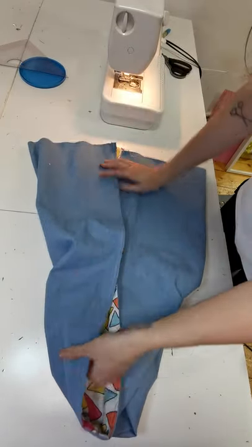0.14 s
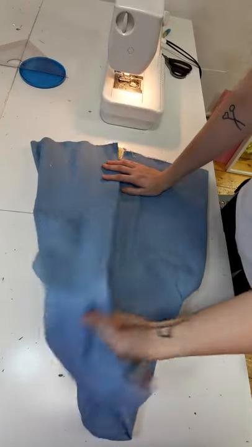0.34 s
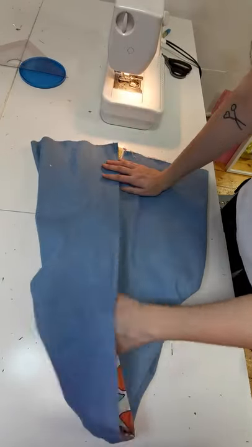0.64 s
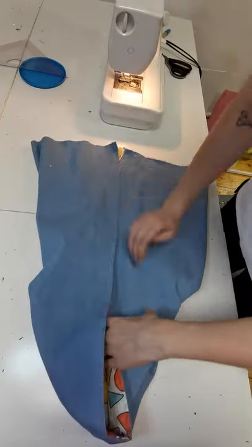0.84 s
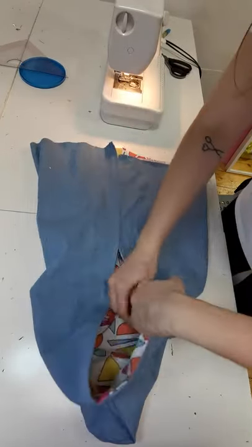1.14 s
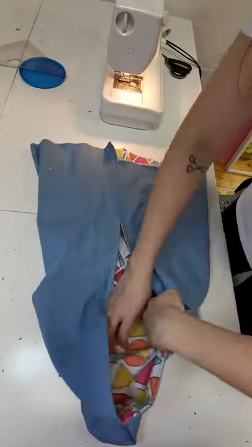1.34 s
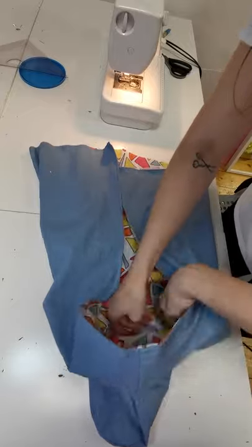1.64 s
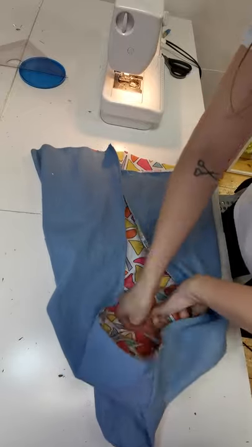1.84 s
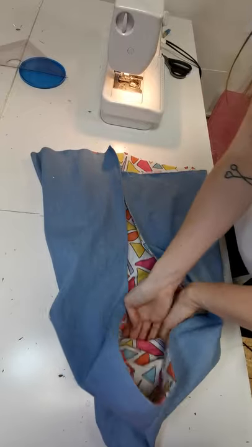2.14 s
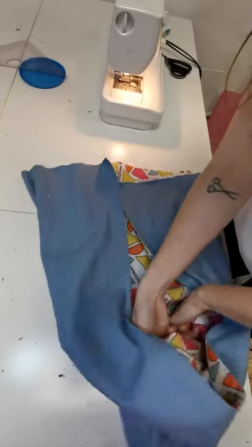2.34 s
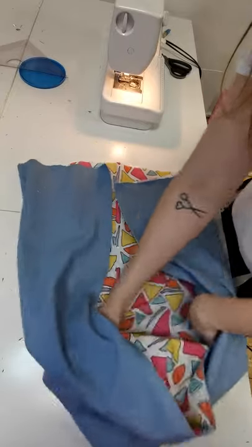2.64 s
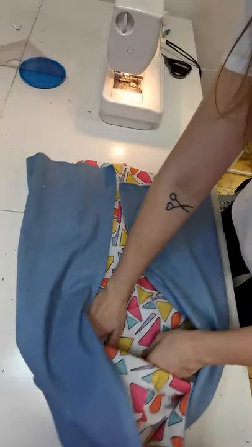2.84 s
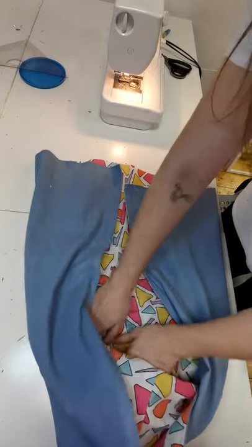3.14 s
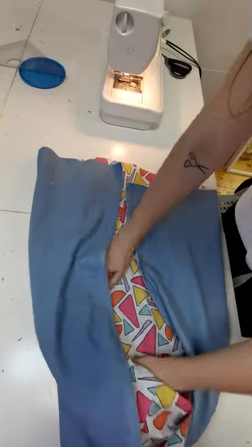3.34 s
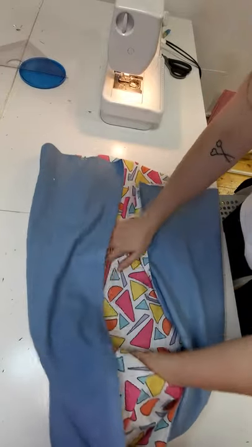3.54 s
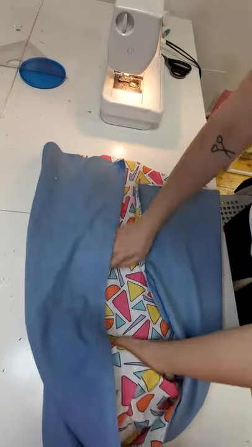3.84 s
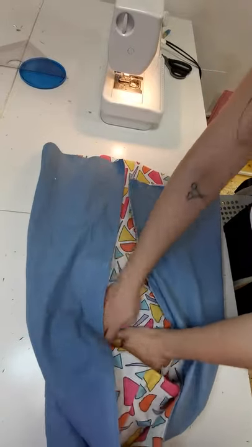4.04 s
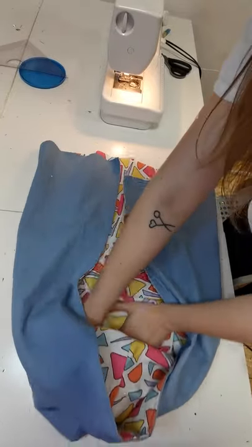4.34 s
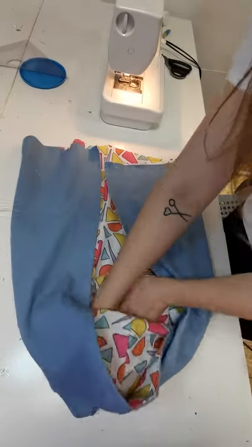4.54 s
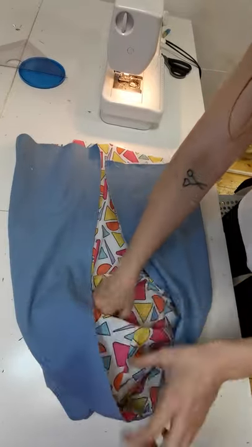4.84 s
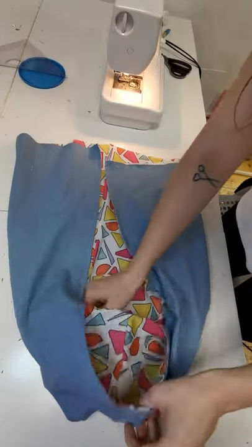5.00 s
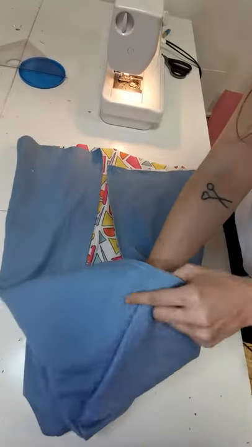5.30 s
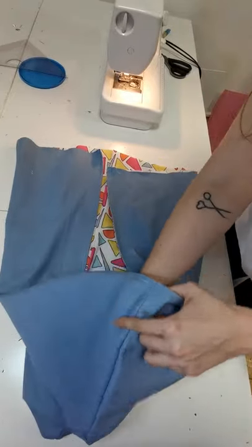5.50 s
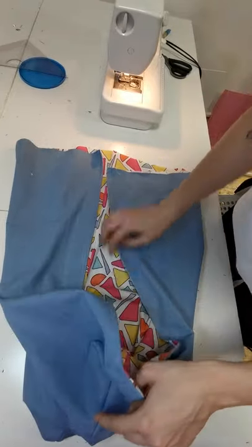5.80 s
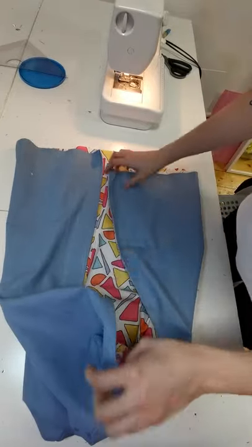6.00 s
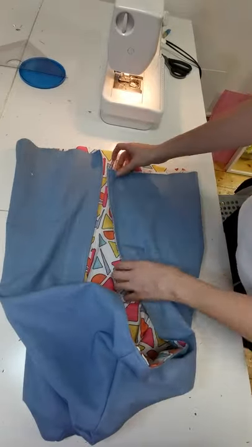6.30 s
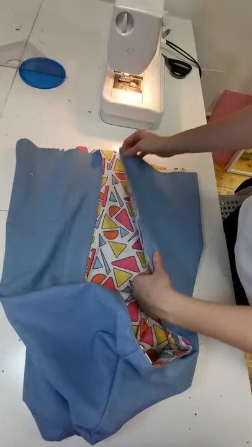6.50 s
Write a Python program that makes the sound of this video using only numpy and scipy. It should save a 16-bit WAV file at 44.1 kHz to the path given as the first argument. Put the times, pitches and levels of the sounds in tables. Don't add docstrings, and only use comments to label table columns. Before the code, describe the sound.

Hands fold and smooth heavy fabric in a quiet room, giving dull brushes, small ticks and knocks before a single loud thud.

```python
import sys
import numpy as np
from scipy import signal
from scipy.fft import rfft, irfft, next_fast_len
from scipy.io import wavfile
from scipy.ndimage import uniform_filter1d, map_coordinates

SR = 44100
rng = np.random.default_rng(int(sys.argv[2]) if len(sys.argv) > 2 else 0)


def volts_from_decibels(level):
    exponent = np.asarray(level, float) / 20
    return 10 ** exponent


def wrap_up_sound(samples):
    columns = np.atleast_2d(samples).T
    tamed = np.clip(columns, -1, 1)
    steps = np.round(tamed * 32767).astype(np.int16)
    wavfile.write(sys.argv[1], SR, steps)


N = 293706

# fastest moment in s, hiss in dB, rise in s, fall in s, sheen in dB.
STROKE_EVENTS = [(.1, -66.5, 0.033, 0.099, 0), (.26, -61, 0.12, 0.19, -2), (.352, -58.5, 0.035, .03, 1.5),
                 (0.396, -50, 0.037, 0.016, 0), (.55, -59, 0.049, 0.059, -3),
                 (.65, -67.5, 0.07, 0.067, -0.5), (.97, -67, 0.14, 0.65, -3),
                 (1.047, -64.5, 0.11, 0.041, -0.5), (1.35, -63.5, 0.15, 0.28, -1.5),
                 (1.75, -66, 0.2, 0.52, -5), (2.2, -65, 0.21, 0.44, -2.5), (2.53, -59.5, 0.089, .12, -4),
                 (2.9, -66, 0.085, 0.064, -16), (2.7, -71, .3, .7, -3.5), (3.3, -54.5, 0.055, 0.063, -3),
                 (3.62, -56, 0.058, 0.069, -0.8), (3.8, -66.5, 0.51, 0.11, -4.5),
                 (4.04, -63.5, 0.14, .08, -1.5), (4.42, -58, 0.26, .12, -5),
                 (4.68, -65.5, 0.11, 0.072, -2.5), (5.02, -64.5, 0.1, 0.1, -2.5),
                 (5.18, -66, 0.09, 0.14, 0), (5.55, -68, 0.6, 0.16, -3), (6, -72, 0.076, 0.16, 1.5),
                 (6.6, -64.5, 0.18, 0.065, -0.5)]
# frequency in Hz, density in dB per Hz.
FIBRE_SPECTRUM = [(880, -6), (1500, 0), (2380, -3), (2900, -4.5), (4460, -5), (4680, -4), (6170, -6),
                  (6870, -3.5), (7880, -7), (13100, -15.5), (15700, -12.5)]
# time in s, left-right difference in dB.
HAND_PATH = [(0, -20), (.22, -2.5), (.35, -6), (.55, -2), (.78, -5), (1.3, -4), (2.3, -3), (2.52, -9.5),
             (2.65, -7), (3.3, -4), (4.06, -3.5), (4.6, -4.5), (5.17, -6), (5.6, -5), (5.95, -3),
             (6.66, -1.5)]
# tightest moment in s, crumple in dB, rise in s, fall in s, scuff over it in dB.
CRUMPLE_EVENTS = [(.1, -62.5, 0.35, 0.27, -0.5), (.3, -53.5, 0.036, 0.014, -0.5),
                  (.39, -54, 0.098, .02, -16), (.54, -60.5, 0.072, 0.035, -3), (0.631, -59, .07, 0.11, -4),
                  (1.05, -61, 0.27, 0.062, -18), (1.31, -59, 0.025, 0.15, -2), (1.739, -73, 0.17, 0.14, 7),
                  (1.91, -59, 0.6, 0.09, -3), (2.17, -59.5, 0.12, 0.78, -5), (2.47, -57.5, 0.037, 0.31, -9),
                  (2.59, -70, .2, .14, -6), (2.95, -53.5, 0.13, 0.018, -12), (3.17, -65.5, 0.12, 0.93, -2),
                  (3.295, -50, 0.042, 0.041, -1.5), (3.6, -53, 0.05, 0.082, -4),
                  (3.97, -65, 0.26, .8, -1.5), (4.21, -58, 0.043, 0.5, -9),
                  (4.45, -51.5, 0.041, 0.075, -6.5), (4.97, -65, 0.062, 0.21, -2),
                  (5.19, -59, 0.038, 0.068, 0), (5.3, -60.5, 0.035, 0.068, -12), (5.4, -71, 0.11, 1, -24),
                  (6.34, -57, 0.022, 0.048, -3)]
# frequency in Hz, density in dB per Hz.
FOLD_SPECTRUM = [(250, -5.5), (400, -12), (650, -4), (950, -6), (1150, -11), (2500, -26)]
# start in s, peak in dB, snap length in ms, left-right difference in dB.
SNAP_EVENTS = [(.099, -47, 1.8, -3), (.168, -44, 1, -3), (.272, -52, 1.4, -3), (0.29, -47, 1.6, -4),
               (0.531, -48.5, 1.24, -4.5), (0.633, -44, 1.8, -1), (0.928, -45.5, 1.46, 3),
               (1.031, -55, 1.5, -4), (1.229, -43, 1.54, -6), (1.346, -44, 0.91, -8), (1.685, -56, 3.2, 1),
               (1.798, -48, 1.9, -5.5), (1.822, -49, 2.1, -9), (1.845, -41, 0.91, 0),
               (2.251, -50, 1.2, -10), (2.417, -46.5, 3.1, -8), (2.443, -51, 1.2, -10),
               (2.452, -43.5, 1.9, -10), (2.475, -37, 1.94, -11), (2.486, -47, 1.5, -10),
               (2.5, -51, 1.9, -4), (2.569, -44, 1.6, -14), (2.925, -39, 1.32, -16.5),
               (3.275, -43.5, 1.05, -17), (3.311, -43, 1.9, -10), (3.54, -54, 3.2, -2),
               (3.555, -52, 1.1, -2), (3.585, -42, 1.6, -12), (3.595, -40, 1.8, -8), (3.649, -50, 1.1, -13),
               (3.759, -50, 1.4, -3), (4.2, -45.5, 1.9, -11), (4.266, -41, 1.76, -8.5), (4.39, -48, 1.3, 2),
               (4.442, -49, 1.3, -6), (4.533, -48, 1.4, -10), (4.608, -44, 1.5, -1),
               (4.803, -51.5, 0.19, -14), (4.948, -38, 1.12, -3), (5.196, -44.5, 1.7, -10),
               (5.272, -41, 1.4, -9), (5.285, -43, 0.78, -18), (5.344, -50, 1.9, -5),
               (5.625, -47.5, 1.35, -6), (5.675, -52.5, 1.6, -6), (6.602, -63, 1, 0.5)]
# middle in s, peak in dB, pitch in Hz, length in ms.
SQUEAK_EVENTS = [
    (.266, -54, 2020, 6),
    (1.306, -57, 2180, 10),
    (2.552, -60, 2300, 12),
    (4.437, -52.5, 873, 20),
    (6.335, -60, 2300, 10),
]
# middle in s, level in dB, band centre in Hz, half length in s.
RUB_EVENTS = [
    (0.099, -56, 227, 0.093),
    (0.186, -53, 250, .06),
    (0.122, -71, 2050, 0.23),
    (1.341, -68, 2520, 0.083),
    (1.77, -67.5, 1940, 0.19),
    (2.499, -67.5, 2420, 0.14),
    (4.958, -64, 231, 0.14),
]
# start in s, peak in dB, boom in dB, contact time in ms, ring in dB.
KNOCK_EVENTS = [(.166, -43, -7, 4.8, -10), (.63, -46, -16, 3.2, -27), (1.8483, -28, -3.5, 3.26, -13),
                (2.1155, -33, -6, 3.4, -10.5), (2.272, -43, 6, 6, -20), (2.472, -43, 3, 7, -15),
                (2.547, -41, -11, 3.3, -8), (2.7265, -30, -3, 5.2, -11.5), (2.8425, -32.5, -30, 3.26, -12),
                (2.923, -35.5, -1, 2.34, -16), (3.2528, -29, 1, 4.2, -17), (3.275, -38, 0, 3.5, -7),
                (3.585, -37, -11.5, 3.7, -11), (3.6025, -31, 4, 8.7, -19), (3.614, -38, -2, 5.7, -24),
                (3.889, -50.5, 11, 6.5, -10.5), (4.031, -42, 8, 4.9, -6.5), (4.063, -40, -7, 2.84, -22.5),
                (4.182, -49.5, -11, 3.1, 1.5), (4.4045, -35.5, 2, 3.14, -9), (4.4905, -41.5, -25, 3.24, -8)]
# start in s, peak in dB, boom in dB, contact time in ms, ring in dB.
PALM_EVENTS = [
    (6.2665, -19, -1, 3.05, -9),
    (6.2735, -22, -1, 4.2, -30),
    (6.2825, -24.5, -3, 5, -32),
    (6.3295, -38, -3, 4.1, -23),
    (6.3502, -35, -1, 6.7, -20),
]
# start in s, peak in dB.
REPEAT_EVENTS = [(1.856, -47), (1.869, -56), (1.888, -45.5), (1.909, -42.5), (1.927, -49), (2.126, -53),
                 (2.135, -45), (2.157, -47), (2.7453, -37), (2.765, -44), (2.778, -42), (2.785, -61),
                 (3.263, -42), (3.285, -33.5), (3.294, -51), (3.631, -41), (4.418, -39.5), (4.52, -50.5)]
# mode in Hz, level in dB, decay t60 in s.
FREE_MODES = [(103, 3.5, 0.58), (126, 7.5, 0.08), (153.7, -1, 0.59), (171.5, -1.5, 0.62)]
# mode in Hz, level in dB, decay t60 in s.
LOADED_MODES = [(102.7, 7.5, 0.35), (125, 6, 0.19), (165, -6.5, 0.28), (184, -6, 0.22)]
# mode in Hz, level in dB, decay t60 in s.
PANEL_MODES = [(236, -27, 0.29), (276.3, -1.5, 0.23), (313, 0.5, 0.37), (353, -10, 0.5), (396, -18, 0.35),
               (463, -4.5, 0.39), (539, -6, 0.28), (592, -0.5, 0.2), (642, -3, 0.4), (900, -7, 0.15)]
# peak in s, level in dB, rise in s, fall in s.
SWAY_EVENTS = [(.24, -51, 0.66, 0.016), (.43, -58, 0.1, 0.058), (1.2, -57, 0.059, 0.053),
               (1.87, -59, 0.36, 0.4), (2.49, -53, 0.11, 0.025), (2.74, -41, 0.023, 0.039),
               (3, -51, 0.039, 0.091), (3.3, -48.5, 0.61, 0.11), (3.47, -47.5, .03, 0.02),
               (3.6, -43.5, 0.059, 0.033), (3.7, -52.5, .05, 0.32), (4.04, -68, .1, .13),
               (4.21, -55.5, 0.066, 0.11), (4.75, -60, 0.073, 0.69), (5.84, -55, 0.049, 0.044),
               (6.3, -60.5, 0.28, .8)]
# peak in s, level in dB, rise in s, fall in s, depth from 0 to 1.
GROAN_EVENTS = [(.19, -52.5, 0.85, 0.13, 0.95), (.43, -62, 0.41, 0.38, 0.9), (.65, -67, .3, .2, 1),
                (1.28, -69, 0.69, 0.59, 0.5), (1.87, -73, 0.7, 0.17, 0.8), (2.09, -62, 0.11, 0.097, 1),
                (2.49, -52.5, 0.059, 0.073, 0.1), (2.63, -58.5, 0.38, 0.071, 0.55),
                (3.04, -56, 0.039, 0.36, 1), (3.47, -64, .06, 0.092, 0.7), (3.6, -51.5, 0.056, 0.041, 0.4),
                (3.7, -57, 0.046, 0.12, 0.6), (4.04, -56, 0.03, 0.1, 0.75), (4.21, -55.5, 0.11, 0.3, 0.6),
                (4.6, -67, .45, 0.48, 0.2), (5.19, -55.5, 0.075, 0.24, 0.17), (5.69, -62.5, 0.21, 0.047, 0),
                (6.29, -69, 0.2, .6, 0.4)]
# time in s, level in dB.
DRAUGHT_LEVEL = [(0, -39.5), (.1, -47.5), (.3, -51.5), (1, -57), (2.5, -72), (3.2, -64), (4.2, -74),
                 (6.66, -65)]
# frequency in Hz, t60 in s.
WALL_DECAY = [(150, 0.29), (600, 0.37), (3000, 0.19), (10000, 0.19)]
# frequency in Hz, density in dB per Hz.
AIR_SPECTRUM = [(178, -26), (209, -20), (452, -26), (612, -35), (683, -17.5), (1650, -24.5), (2290, -25.5),
                (6330, -39), (10700, -41), (15700, -42)]
# centre in Hz, width in Hz, level in dB.
DRONE_BANDS = [(113, 17.4, -10.5), (328, 14, -15.5), (454.8, 7.6, -9), (676, 12, -21)]
# pitch in Hz, level in dB.
MAINS_TONES = [(99.9, -59.5), (164, -68)]
# frequency in Hz, left-right likeness from 0 to 1.
PORT_LIKENESS = [(30, 0.94), (55, 0.99), (200, 0.96), (350, 0.85), (600, 0.61), (1000, 0.39), (2000, 0.18),
                 (4000, 0.09)]
# frequency in Hz, left-right difference in dB.
PORT_BALANCE = [(25, 2.6), (60, 2), (150, 2), (330, 1), (500, -4.5), (800, -4.5), (1800, -3.5),
                (4200, -0.5), (6000, -3.5), (15000, -4.5)]
# frequency in Hz, gain in dB.
LEFT_CAVITY = [(5500, -1.5), (6900, -3), (7700, -3), (8300, -4), (8900, 3), (9400, 1), (10200, -7),
               (12000, -6), (14800, -6), (15500, -9)]
# frequency in Hz, gain in dB.
RIGHT_CAVITY = [(5500, -1), (6200, -3), (6900, -1.5), (8500, -3.5), (10000, -3.5), (10800, -1),
                (12000, -3.5), (13200, 1), (14000, -3.5), (15300, 0.5)]
# frequency in Hz, phase in radians.
HOUSING_PHASE = [(450, 0.15), (800, 0.75), (1200, 1.2), (1700, 0.84), (2800, 0)]

STILL_HISS_DB, STILL_SHEEN_DB, STILL_CRUMPLE_DB = -78, -79, -77
STILL_SCUFF_DB, STILL_SWAY_DB, STILL_GROAN_DB = -79, -69, -68
ROUND, STROKE_ROUND = 1.38, 2.1


def strokes():
    _, hiss_db, _, _, sheen_db = np.transpose(STROKE_EVENTS)
    catch = volts_from_decibels(1.35 * wobble(30) - 0.5)
    fibre_noise = rush(lambda f: volts_from_decibels(along(FIBRE_SPECTRUM, f)), grain_db=1.5, grain_hz=398.3)
    hiss = swell(STROKE_EVENTS, hiss_db, STILL_HISS_DB, STROKE_ROUND) * catch * fibre_noise
    sheen_noise = rush(peak(10570, 3400), grain_db=1.5, grain_hz=376.0)
    sheen_gain = swell(STROKE_EVENTS, hiss_db + 1.93 * sheen_db, STILL_SHEEN_DB, STROKE_ROUND)
    sheen = sheen_gain * catch * sheen_noise
    return sides(curves(HAND_PATH)[0] + 3.4) * patchy(hiss + sheen, depth_db=1.55)


def folds():
    _, crumple_db, _, _, scuff_db = np.transpose(CRUMPLE_EVENTS)
    dull_noise = rush(lambda f: volts_from_decibels(along(FOLD_SPECTRUM, f)), grain_db=3.0, grain_hz=140)
    crumple = swell(CRUMPLE_EVENTS, crumple_db, STILL_CRUMPLE_DB) * dull_noise
    scuff_noise = rush(lambda f: peak(2100, 750)(f) ** 2, grain_db=1.5, grain_hz=151.0)
    scuff = swell(CRUMPLE_EVENTS, crumple_db + scuff_db - 7.0, STILL_SCUFF_DB) * scuff_noise
    snaps = np.zeros((2, N + SR))
    t = np.arange(SR // 40) / SR
    for s, db, snap_ms, pan_db in SNAP_EVENTS:
        hz = 1000 / snap_ms
        direct = wavelet(t - .0018, hz, lean=-0.1015)
        off_top = 0.044 * wavelet(t - .0037, hz, lean=-0.81)
        snaps[:, round(s * SR):][:, :len(t)] += volts_from_decibels(db + 1.5) * sides(pan_db + 3.0)[:, None] * (direct + off_top)
    snaps = snaps[:, :N]
    return crumple + scuff + snaps + volts_from_decibels(-6.0) * walls(snaps.mean(axis=0))


def squeaks():
    t = np.arange(N) / SR
    out = np.zeros(N)
    for s, db, hz, length_ms in SQUEAK_EVENTS:
        fade = np.exp(-((t - s) * 2000 / length_ms) ** 2)
        out += volts_from_decibels(db) * fade * np.sin(2 * np.pi * hz * t)
    return out


def rubs():
    out = np.zeros((2, N + SR))
    t = np.arange(SR) / SR - .5
    f = np.fft.rfftfreq(SR, 1 / SR)
    for s, db, hz, half_s in RUB_EVENTS:
        band = peak(hz, 0.24 * hz)(f) ** 2
        one, other = irfft(rfft(rng.standard_normal((2, SR))) * band, SR)
        turn = port_angle(hz)
        pair = unit(np.cos(turn) * one + np.sin(turn) * other * np.array([[1], [-1]]))
        out[:, round(s * SR):][:, :SR] += volts_from_decibels(db) * np.exp(-(t / half_s) ** 2) * pair
    return out[:, SR // 2:][:, :N]


def table():
    thump = blows(PALM_EVENTS, FREE_MODES, damping=0.61, scatter_db=0.9, lean=-1.36, rebound=.05)
    knocks = blows(KNOCK_EVENTS, LOADED_MODES, damping=0.46, scatter_db=2.0, lean=-0.33, rebound=0.27)
    settle = [(s, db, -3, 5.16, -18) for s, db in REPEAT_EVENTS]
    knocks = knocks + blows(settle, LOADED_MODES, damping=0.76, scatter_db=2.0, lean=-0.96, rebound=0.083)
    struck = thump + volts_from_decibels(-11) * walls(thump) + knocks + volts_from_decibels(-7.5) * walls(knocks)
    return struck + sway() + groan() + draught()


def blows(rows, boom, damping, scatter_db, lean, rebound):
    top = np.zeros(N + SR)
    t = np.arange(int(damping * SR / 2)) / SR
    chances = scatter_db * rng.standard_normal((40, len(boom + PANEL_MODES), 2))
    for (s, db, boom_db, contact_ms, ring_db), chance in zip(rows, chances):
        hz = 1000 / contact_ms
        modes = [(f, level + boom_db, t60) for f, level, t60 in boom] + PANEL_MODES
        ring = np.zeros(len(t))
        for k, ((f, level, t60), (a, b)) in enumerate(zip(modes, chance)):
            decay = volts_from_decibels(level + a - 60 * t / (t60 * damping))
            ring += (-1) ** k * decay * np.sin(2 * np.pi * f * (1 + 0.01 * b) * t)
        contact = np.exp(-(np.arange(-3, 3, 5.37 * hz / SR)) ** 2)
        ring = signal.fftconvolve(ring, contact / contact.sum())[:len(t)]
        push = wavelet(t - .0045, hz, lean)
        bounce = rebound * wavelet(t - .0045 - 1 / hz, hz, lean)
        top[round(s * SR):][:len(t)] += volts_from_decibels(db) * (volts_from_decibels(ring_db) * ring + push + bounce)
    return top[:N]


def sway():
    shape = [(15, 0.0), (28, 0.0), (70, 0.5), (95, -3.5), (130, -45.5)]  # (Hz, dB)
    gain = swell(SWAY_EVENTS, np.transpose(SWAY_EVENTS)[1] - 2.4, STILL_SWAY_DB)
    return gain * rush(lambda f: volts_from_decibels(along(shape, f)))


def groan():
    _, groan_db, _, _, depth = np.transpose(GROAN_EVENTS)
    share = np.clip(depth, .01, .99)
    deep, shallow = (rush(lambda f: peak(hz, .9 * hz)(f) ** 2, grain_db=1.5, grain_hz=43.2) for hz in (150, 340))
    whole = swell(GROAN_EVENTS, groan_db + 10 * np.log10(share), STILL_GROAN_DB) * deep
    panels = swell(GROAN_EVENTS, groan_db + 10 * np.log10(1 - share), STILL_GROAN_DB) * shallow
    return (whole + panels) * volts_from_decibels(-2.0)


def draught():
    return volts_from_decibels(curves(DRAUGHT_LEVEL)[0]) * rush(lambda f: peak(14, 16)(f) ** 2)


def walls(x):
    hz, t, z = signal.stft(rng.standard_normal((2, SR // 2)), SR, nperseg=256)
    turn = port_angle(hz)[:, None]
    mid, side = np.cos(turn) * z[0], np.sin(turn) * z[1]
    z = np.array([mid + side, mid - side])
    tail = signal.istft(z * volts_from_decibels(-60 * t / along(WALL_DECAY, hz)[:, None]), SR, nperseg=256)[1]
    late = np.pad(x, (300, 0))[None]
    return signal.fftconvolve(late, tail / np.linalg.norm(tail[0]), axes=1)[:, :N]


def room():
    air = rush(lambda f: volts_from_decibels(along(AIR_SPECTRUM, f)) * (f > 200)) * volts_from_decibels(-67)
    t = np.arange(N) / SR
    mains = sum(np.sqrt(2) * volts_from_decibels(db + 1.7 * wobble(8.3)) * np.sin(2 * np.pi * hz * t) for hz, db in MAINS_TONES)

    def bands(f):
        return np.sqrt(sum((volts_from_decibels(db) * peak(hz, width_hz)(f)) ** 2 for hz, width_hz, db in DRONE_BANDS))
    return air + mains + volts_from_decibels(-66) * rush(bands)


def swell(rows, db, still_db, top=ROUND):
    s, rise_s, fall_s = (np.array([row[k] for row in rows])[:, None] for k in (0, 2, 3))
    coarse = np.arange(0, N, 64)
    late = coarse / SR - s
    off = np.where(late < 0, -late / np.abs(rise_s), late / np.abs(fall_s))
    power = (volts_from_decibels(np.asarray(db)[:, None] - 10 * off ** top) ** 2).sum(axis=0) + volts_from_decibels(still_db) ** 2
    return np.interp(np.arange(N), coarse, np.sqrt(power))


def rush(gain, grain_db=0, grain_hz=300):
    grain = volts_from_decibels(grain_db * np.clip(wobble(grain_hz), -3, 2)) if grain_db else 1
    pair = rng.standard_normal((2, N)) * grain

    def response(hz):
        turn = port_angle(hz)
        return gain(hz) * [np.cos(turn), np.sin(turn)]
    mid, side = filtered(pair, response)
    return unit(np.array([mid + side, mid - side]))


def patchy(x, depth_db):
    z = signal.stft(x, nperseg=512)[2]
    field = uniform_filter1d(rng.standard_normal(z.shape[1:]), size=14, axis=0)
    field = uniform_filter1d(field, size=16, axis=1)
    return signal.istft(z * volts_from_decibels(depth_db * unit(field)), nperseg=512)[1][:, :N]


def wavelet(t, hz, lean):
    u = np.pi * hz * t
    return (1 - 2 * u * u - lean * u) * np.exp(-u * u)


def peak(hz, width_hz):
    return lambda f: f * width_hz / np.hypot(hz * hz - f * f, f * width_hz)


def port_angle(hz):
    return np.arccos(np.clip(along(PORT_LIKENESS, hz), 0, 1)) / 2


def sides(db):
    return volts_from_decibels(np.array([db / 2, -db / 2]))


def filtered(x, response):
    m = next_fast_len(N + SR // 10)
    return irfft(rfft(x, m) * response(np.fft.rfftfreq(m, 1 / SR)), m)[..., :N]


def wobble(rate):
    knots = rng.standard_normal(int(N * rate / SR) + 4)
    return map_coordinates(knots, [np.arange(N) * rate / SR])


def curves(rows):
    s, *cols = np.transpose(rows)
    return [np.interp(np.arange(N) / SR, s, c) for c in cols]


def along(points, hz):
    f, v = np.transpose(points)
    return np.interp(np.log(hz + 1), np.log(f + 1), v)


def unit(x):
    return x / np.sqrt(np.mean(x ** 2) + 1e-20)


def scene():
    return strokes() + folds() + squeaks() + rubs() + table() + room()


def band_limit(x):
    return signal.sosfilt(signal.butter(12, 15820, fs=SR, output="sos"), x)


def record(dry):
    def response(hz):
        phase = np.pi * hz * 4 / SR + along(HOUSING_PHASE, hz) / 2
        lag = np.exp(-1j * phase * np.array([[1], [-1]]))
        cavities = volts_from_decibels([along(LEFT_CAVITY, hz), along(RIGHT_CAVITY, hz)])
        return sides(along(PORT_BALANCE, hz)) * cavities * (hz < 15750) * lag
    ports = filtered(dry, response) - .0002
    return band_limit(ports)


dry = scene()
out = record(dry)
wrap_up_sound(out)
```